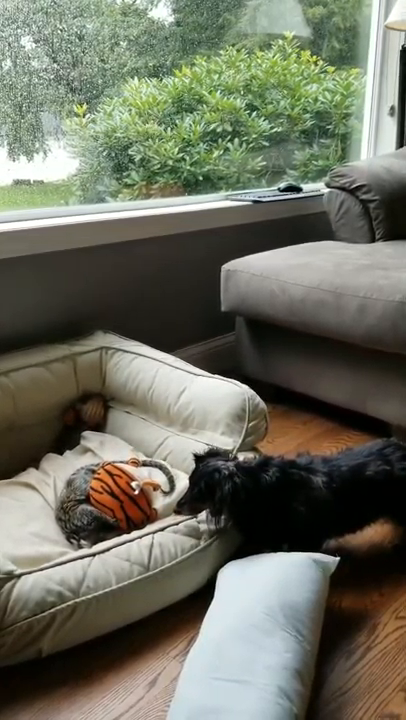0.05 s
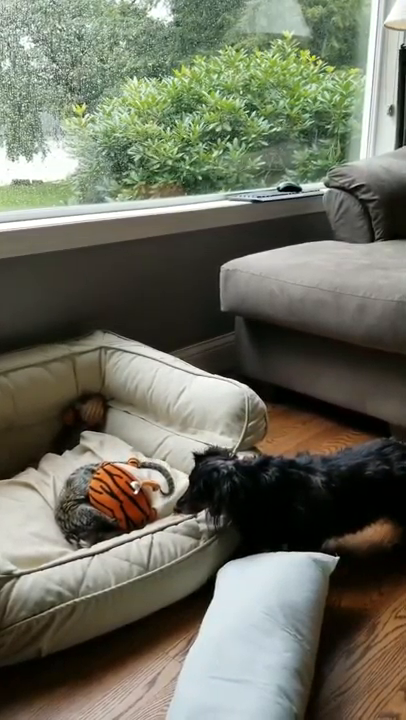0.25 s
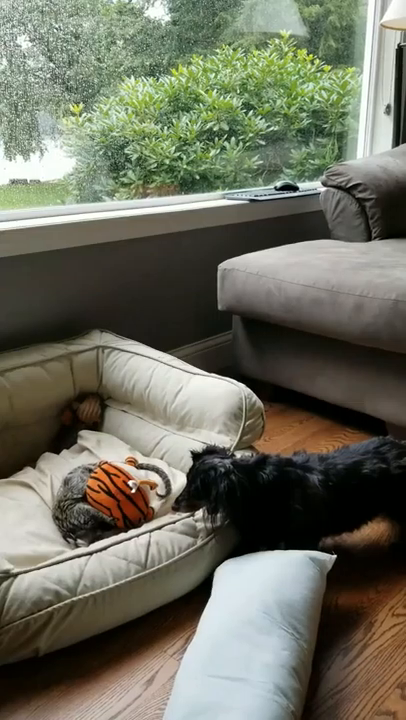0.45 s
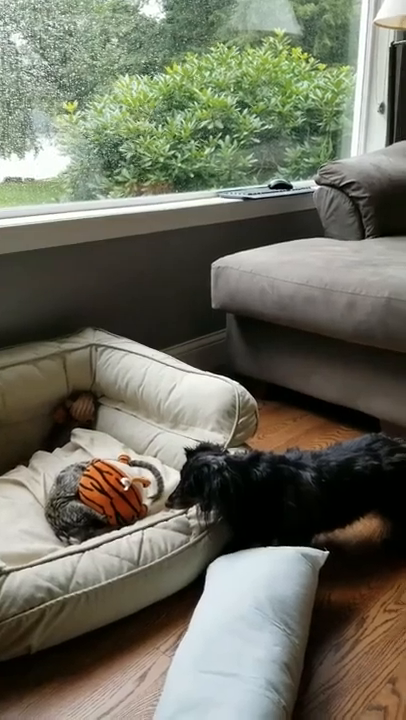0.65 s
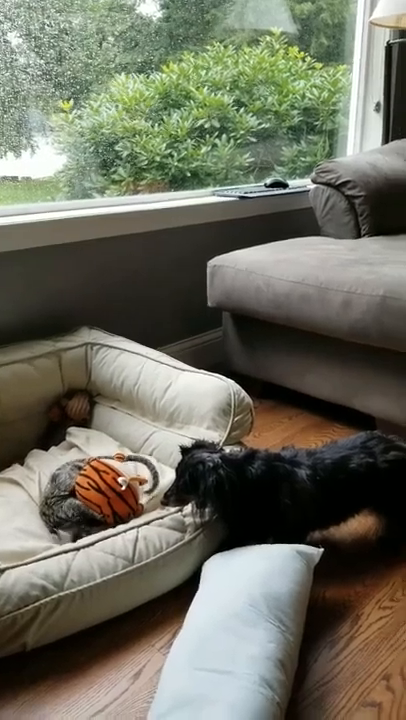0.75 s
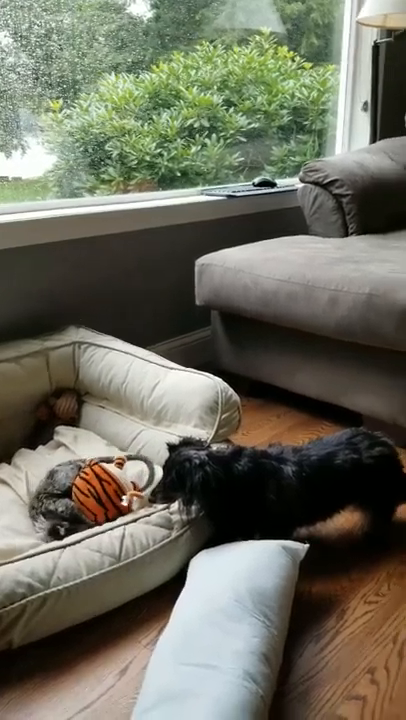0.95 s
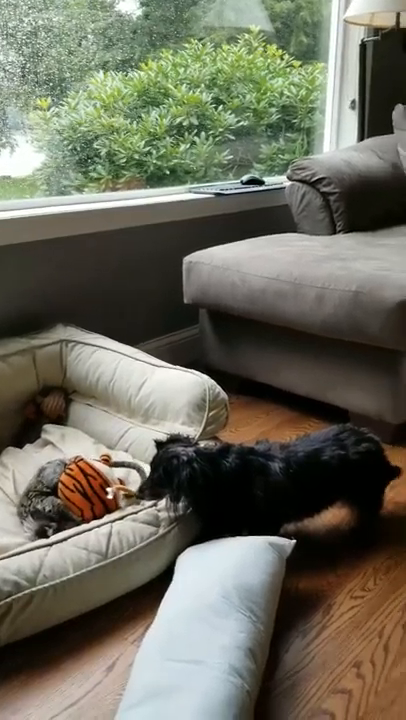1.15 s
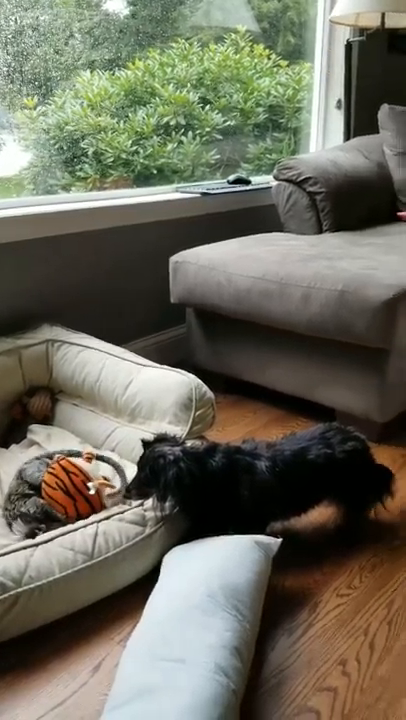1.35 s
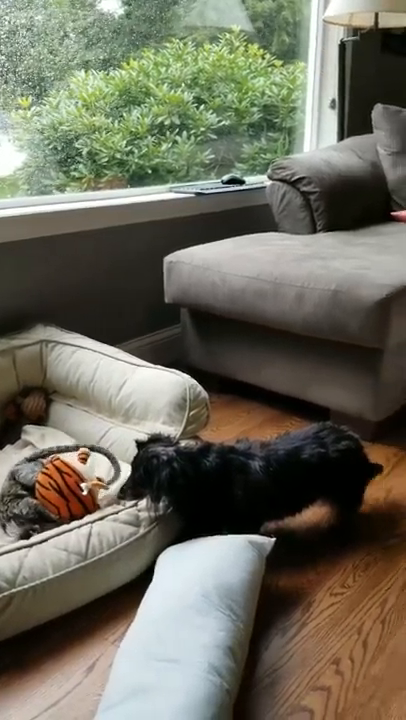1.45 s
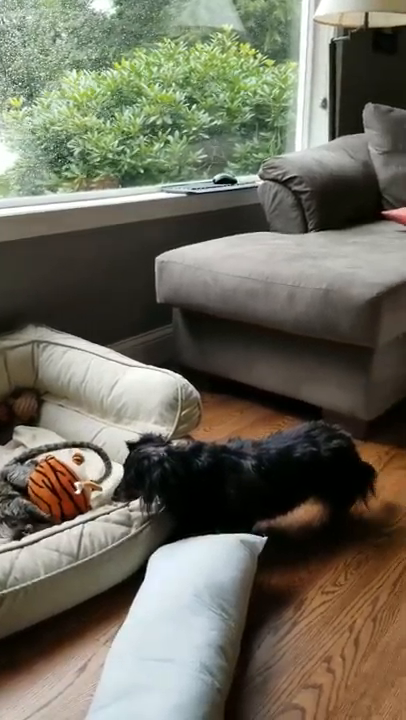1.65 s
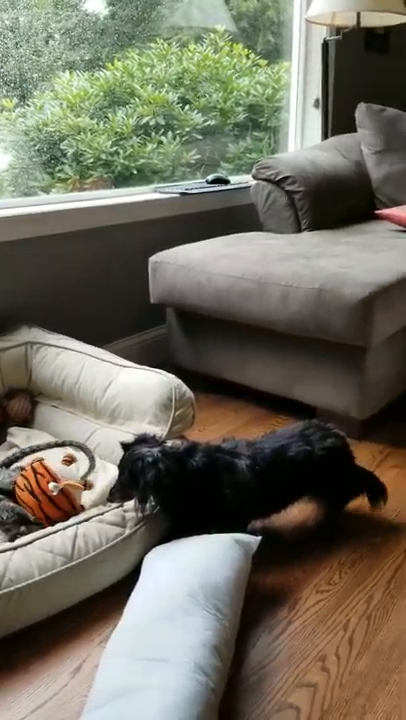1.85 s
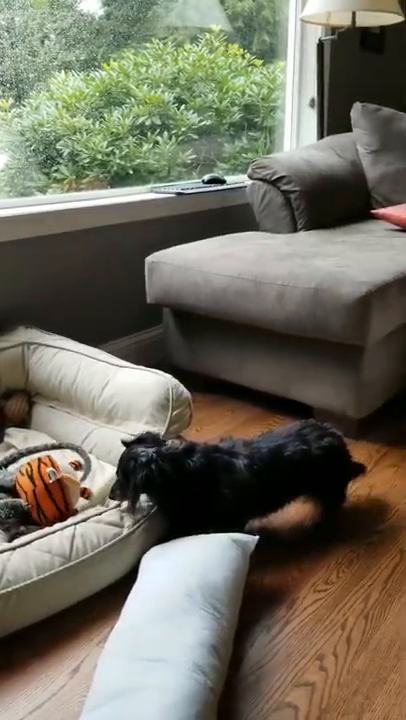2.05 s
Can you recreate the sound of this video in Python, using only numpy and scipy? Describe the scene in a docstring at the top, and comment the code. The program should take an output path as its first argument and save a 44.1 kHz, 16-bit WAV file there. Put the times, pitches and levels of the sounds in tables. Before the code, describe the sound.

A small monkey gives three brief, very high chirps, then a harsh screech and a falling, trilled whistle. The calls echo slightly in a quiet living room, over a few soft bumps and a low rumble.

```python
"""A quiet living room, where a marmoset on a dog's bed gives three high chirps, a harsh screech
and a falling, trilled whistle. Chirps and whistle are gliding tones; the screech is a strained
voice puffing through the resonances of the throat. Hard surfaces throw the calls back, and the
right microphone is shaded from their treble. Underneath sit a few soft low bumps, a tick,
faint scuffs and the rumble and hum of the room."""
import sys
import numpy as np
from scipy import signal
from scipy.fft import rfft, irfft
from scipy.io import wavfile

SR = 44100
rng = np.random.default_rng(int(sys.argv[2]) if len(sys.argv) > 2 else 0)


def store_wav(level_fs):
    """Save 16-bit WAV to argv[1]."""
    pcm = np.round(np.clip(np.atleast_2d(level_fs), -1, 1) * 32767)
    wavfile.write(sys.argv[1], SR, pcm.T.astype(np.int16))


N = 92610
T = np.arange(N) / SR
HZ = np.fft.rfftfreq(N, 1 / SR)

# One contour per chirp. Each row: time in seconds, pitch in Hz, level in dB.
CHIRPS = [
    [(.108, 9440, -76), (.120, 10250, -65), (.127, 10800, -55), (.137, 10370, -60), (.144, 9100, -65.5),
     (.156, 8650, -67), (.166, 8520, -59)],
    [(.266, 7200, -50.5), (.274, 7400, -49), (.280, 8900, -68), (.286, 9900, -44), (.292, 10600, -38.5),
     (.297, 10000, -64), (.305, 8100, -48), (.310, 6860, -37), (.316, 4957, -56), (.322, 3540, -63.5),
     (.329, 2915, -71)],
    [(.523, 8300, -67), (.532, 9400, -52), (.539, 9960, -39), (.549, 9980, -54.5), (.555, 9200, -69),
     (.561, 8140, -47), (.566, 7000, -35.5), (.571, 5890, -49), (.579, 4430, -64.5)],
]
# The chirps' bright edge. Each row: multiple of the pitch, level at full brightness in dB.
CHIRP_OVERTONES = [(2, -1), (3, 14)]
# Hoarseness, most as the middle chirp starts. Each row: time in seconds, jitter as a share of pitch.
CHIRP_JITTER = [(.14, .007), (.27, 0.025), (.29, 0.013), (.54, 0.0053)]

# The screech's faders. Each row: time in seconds, then main band, upper band and low rasp in dB.
SCREECH_FADERS = [(0.7, -74, -82, -87), (0.714, -55.5, -76, -73), (0.748, -46.5, -60.5, -72),
                  (0.794, -52.5, -51.5, -72.5), (0.814, -47, -51, -66), (0.878, -48.5, -45.5, -62),
                  (0.924, -52.5, -51, -66), (0.962, -52, -49, -64.5), (0.988, -55.5, -48.5, -64.5),
                  (1.066, -46.5, -39, -63.5), (1.076, -42.5, -34, -64.5), (1.144, -50.5, -45.5, -64),
                  (1.2, -47, -41, -58.5), (1.226, -50.5, -55, -65), (1.25, -68, -74, -73)]
# The throat's colour at the onset and at full cry. Each row: frequency in Hz, gain in dB.
THROAT_START = [(3000, -49), (4000, -35.5), (4800, -14), (6000, -6.5), (6800, -3), (7600, -6.5),
                (8700, -16.5), (9900, -21), (11000, -17.5), (13000, -22.5), (16000, -11)]
THROAT_FULL = [(3000, -64), (4200, -28), (5500, -17.5), (6500, -8), (7350, 2), (7900, -4), (8900, -20.5),
               (10400, -27.5), (11800, -12.5), (12900, -10), (14300, -11), (15600, 1)]
# The sweep of the throat's upper resonance. Each row: time in seconds, centre in Hz.
UPPER_SWEEP = [(.78, 12200), (.86, 13000), (.95, 13500), (1.03, 14200), (1.09, 13100), (1.17, 13450),
               (1.23, 14000)]
# The resonances of the low rasp. Each row: centre in Hz, width in Hz, relative gain in dB.
RASP_MODES = [(820, 170, -14), (1154, 140, -16), (1750, 74, 1.5), (1865, 89, 0), (2010, 100, -2),
              (2175, 110, -.5), (2290, 70, -1), (2520, 100, -6)]
# The hoarse squeak that ends the screech. Each row: time in seconds, pitch in Hz, level in dB.
SQUEAK = [(1.214, 6690, -50.5), (1.223, 6405, -42.5), (1.229, 6200, -75), (1.236, 6330, -77)]

# The whistle's fall. Each row: time in seconds, pitch at the foot of the trill in Hz, level in dB.
WHISTLE = [(1.422, 9350, -75), (1.450, 9640, -61), (1.463, 8840, -60), (1.478, 8740, -62.5),
           (1.497, 8230, -56), (1.585, 7920, -56.5), (1.660, 7500, -52.5), (1.700, 7275, -53),
           (1.740, 6980, -52), (1.778, 6680, -47.5), (1.815, 6350, -51.5), (1.828, 6280, -56.5),
           (1.846, 6820, -72)]
# The depth of the trill. Each row: time in seconds, upward swing in Hz.
TRILL_DEPTH = [(1.47, 550), (1.52, 400), (1.60, 600), (1.675, 1150), (1.712, 1900), (1.798, 2500),
               (1.825, 100)]

# Slaps off hard surfaces. Each row: delay in seconds, left and right gain in dB re the left direct sound.
REFLECTIONS = [(.0045, -4, -5.5), (.0080, 6.5, -6), (0.0169, -4.5, -3.5)]
# The reverb tail. Each row: frequency in Hz, seconds to fall by 60 dB.
ROOM_T60 = [(1500, 0.23), (4000, 0.4), (7000, 0.32), (10000, 0.27), (15000, 0.17)]
# The shading of the right microphone. Each row: frequency in Hz, gain in dB.
RIGHT_SHADE = [(2400, 1.5), (4500, -1.5), (6000, -12), (7200, -21.5), (8300, -23.5), (9800, -10.5),
               (10800, -1.5), (12500, -1.5), (15500, -36)]

# Soft thuds. Each row: start in seconds, level before panning in dB, pitch in Hz, decay in seconds.
BUMPS = [(.111, -49.5, 151, 0.0041), (.218, -37, 144, 0.0021), (.247, -41.5, 72, 0.0047),
         (0.324, -42.5, 98.4, 0.0046), (.408, -42.5, 100, 0.0037), (0.452, -44, 124, 0.0045),
         (0.482, -56, 89, 0.0027), (0.54, -52.5, 125, 0.0086), (.718, -53, 80, .012)]
# The rustle around the bumps. Each row: time in seconds, level before panning in dB.
RUSTLE_FADER = [(.05, -89), (.13, -63.5), (.29, -54.5), (.335, -51), (.38, -59), (.475, -51.5), (.56, -58),
                (.68, -86)]
# Its dull colour. Each row: frequency in Hz, relative gain in dB.
RUSTLE_COLOUR = [(25, -1), (120, 2.5), (300, -8.5), (600, -19), (1000, -37), (3000, -49)]
# Soft scuffs. Each row: peak time in seconds, level in dB, centre in Hz, half length in seconds.
SCUFFS = [(0.223, -81, 2930, 0.0055), (0.602, -79, 2070, 0.043), (1.013, -61, 9100, 0.048),
          (1.492, -81, 2400, 0.041)]
# The colour of the room tone. Each row: frequency in Hz, relative gain in dB.
RUMBLE_COLOUR = [(20, -7.5), (50, 1.5), (90, -1.5), (130, 2.5), (180, -8.5), (260, -3), (340, -11),
                 (440, -8.5), (600, -19), (850, -23.5), (1100, -28.5), (2000, -31), (4000, -36.5),
                 (9000, -36), (15500, -37)]
# How centred the room tone is. Each row: frequency in Hz, left-right correlation from 0 to 1.
RUMBLE_CORRELATION = [(30, 0.12), (120, 0.67), (300, 0.93), (700, 0.17), (1500, 0.051)]
# The tones of the hum. Each row: pitch in Hz, level in dB.
HUM = [(79, -70.5), (119, -68), (420, -76)]


def chirps():
    """Each chirp arches up as a nearly pure tone, then plunges and turns bright."""
    full_plunge_hz_per_s = 110000
    out = np.zeros(N)
    for contour in CHIRPS:
        fall_hz_per_s = -np.gradient(curve(contour)) * SR
        brightness = np.clip(fall_hz_per_s / full_plunge_hz_per_s, .29, 1)
        out += voice(contour, CHIRP_OVERTONES, curve(CHIRP_JITTER), brightness=brightness)
    return out


def screech():
    """A strained voice rings the throat in two high bands and a low rasp, then breaks into a squeak."""
    puffs = strained_puffs()
    main, upper = throat(puffs)
    cry = (main * amp(4.5 + curve(SCREECH_FADERS))
           + upper * amp(6.5 + curve(SCREECH_FADERS, column=2))
           + rasp(puffs) * amp(2.5 + curve(SCREECH_FADERS, column=3)))
    start_s, end_s, release_db_per_s = SCREECH_FADERS[0][0], SCREECH_FADERS[-1][0], 903
    release = amp(-release_db_per_s * np.maximum(T - end_s, 0))
    squeak = voice(SQUEAK, overtones=[(2, 12)], jitter=.035)
    return cry * release * (T > start_s) + squeak


def strained_puffs(puffs_per_s=430, jitter=.4, spread_db=1.5, duty=.22, steady_share=.09):
    """Rapid puffs of noise, uneven in timing and strength, over a thin steady hiss."""
    cycles = np.cumsum(puffs_per_s * np.exp(jitter * wander(puffs_per_s))) / SR
    strength = amp(spread_db * rng.standard_normal(N))[cycles.astype(int)]
    return rng.standard_normal(N) * (steady_share + strength * np.exp(-(cycles % 1) / duty))


def throat(puffs, open_at_s=.81, opening_s=.1, split_hz=9650, broad_share=.45):
    """The throat opens to full cry; its main resonance shakes while the upper one sweeps."""
    opened = np.clip((T - open_at_s) / opening_s, 0, 1)
    start, full = rfft(colour(puffs, THROAT_START)), rfft(colour(puffs, THROAT_FULL))
    main, upper = [(1 - opened) * unit(irfft(start * band, N)) + opened * unit(irfft(full * band, N))
                   for band in (HZ < split_hz, HZ >= split_hz)]
    shaking_hz = 6980 * (1 + .06 * wander(140))
    main_ring = resonate(main, shaking_hz, width_hz=1300)
    upper_ring = resonate(upper, curve(UPPER_SWEEP), width_hz=2600)
    return unit(broad_share * main + main_ring), unit(broad_share * upper + upper_ring)


def rasp(puffs, swell_db=2.6, drift=.016, waver_hz=22):
    """The grit under the screech: the puffs ring low resonances that waver in level and pitch."""
    out = np.zeros(N)
    for hz, width_hz, db in RASP_MODES:
        gain = amp(db + swell_db * wander(waver_hz))
        out += gain * resonate(puffs, hz * (1 + drift * wander(waver_hz)), width_hz)
    return unit(out)


def whistle(trills_per_s=25.2, crest_s=1.713, dip_db_per_khz=7):
    """A long, wavering fall with a growing trill; the voice thins at each upward flick."""
    flicks = (.5 + .5 * np.cos(2 * np.pi * trills_per_s * (T - crest_s))) ** 2
    swing_hz = curve(TRILL_DEPTH) * flicks
    dip = amp(-dip_db_per_khz * swing_hz / 1000)
    return dip * voice(WHISTLE, overtones=[(2, -15)], jitter=.005, swing_hz=swing_hz, brightness=dip)


def voice(contour, overtones, jitter, swing_hz=0, brightness=1):
    """An unsteady high tone; its overtones, each a multiple and a level in dB, fade out towards 21 kHz."""
    hz = (curve(contour) + swing_hz) * (1 + jitter * wander(615))
    phase = 2 * np.pi * np.cumsum(hz) / SR
    tone = np.sin(phase)
    for multiple, db in overtones:
        audible = np.clip((21000 - multiple * hz) / 4000, 0, 1)
        tone += brightness * audible * amp(db) * np.sin(multiple * phase)
    return np.sqrt(2) * tone * amp(curve(contour, column=2)) * gate(contour)


def room(calls, tail_db=7.5, build_s=.0056):
    """Direct sound, a few hard reflections and a short diffuse tail, shaded on the right."""
    size = SR // 2
    hz, t, noise = signal.stft(rng.standard_normal((2, size)), SR, nperseg=256)
    decay = np.exp(-np.log(1000) * t / read(ROOM_T60, hz)[:, None])
    tail = signal.istft(noise * decay, SR)[1][:, :size]
    tail *= np.clip(T[:size] / build_s - .5, 0, 1)  # a short gap, then the tail fades in
    response = tail / np.linalg.norm(tail[0]) * amp([[tail_db], [tail_db + 1]])
    response[:, 0] += amp([0, 6])  # direct sound, hotter on the right ahead of the shading
    for delay_s, left_db, right_db in REFLECTIONS:
        response[:, round(delay_s * SR)] += amp([left_db, right_db])
    response /= np.linalg.norm(response[0])
    left, right = signal.fftconvolve(calls[None], response, axes=1)[:, :N]
    return np.array([left, colour(right, RIGHT_SHADE)])


def bumps(left_db=-14.5, right_db=4):
    """Low, round thuds with a dull rustle, panned well to the right."""
    rustle = unit(colour(rng.standard_normal(N), RUSTLE_COLOUR))
    out = rustle * amp(curve(RUSTLE_FADER)) * gate(RUSTLE_FADER)
    for start_s, db, hz, decay_s in BUMPS:
        age = np.maximum(T - start_s, 0)
        envelope = (age / decay_s / 2) ** 2 * np.exp(2 - age / decay_s)  # soft attack, peaks at 1
        out += amp(db) * envelope * np.cos(2 * np.pi * hz * age)
    return out * amp([[left_db], [right_db]])


def tick(start_s=.4705, db=-53, decay_s=.0006):
    """One tiny, dry crack of noise in the centre."""
    envelope = (T > start_s) * np.exp(-abs(T - start_s) / decay_s)
    return amp(db) * rng.standard_normal(N) * envelope


def scuffs():
    """Faint, wide hisses that swell and fade, like brushes on fabric."""
    out = np.zeros((2, N))
    for channel in out:
        for peak_s, db, hz, half_s in SCUFFS:
            hiss = unit(resonate(rng.standard_normal(N), hz, width_hz=.38 * hz))
            channel += amp(db) * np.exp(-((T - peak_s) / half_s) ** 2) * hiss
    return out


def room_tone(rumble_db=-59.5, waver_radians=1.46, waver_hz=1.48):
    """A bed of steady rumble with a faint, wavering hum."""
    left, independent = rfft(rng.standard_normal((2, N)))
    correlation = read(RUMBLE_CORRELATION, HZ)
    right = correlation * left + np.sqrt(1 - correlation ** 2) * independent
    rumble = unit(colour(irfft([left, right], N), RUMBLE_COLOUR))
    hum = sum(amp(db) * np.sqrt(2) * np.sin(2 * np.pi * hz * T + waver_radians * wander(waver_hz))
              for hz, db in HUM)
    return amp(rumble_db) * rumble + hum


def resonate(x, hz, width_hz):
    """A resonance of gain 1 that rides a pitch curve, with a double pole for steep sides."""
    carrier = np.exp(2j * np.pi * np.cumsum(hz * np.ones(N)) / SR)
    pole = np.exp(-np.pi * width_hz / SR)
    smoothed = signal.lfilter([(1 - pole) ** 2], [1, -2 * pole, pole * pole], x / carrier)
    return 2 * (carrier * smoothed).real


def wander(rate_hz):
    """Smooth random movement up to about the given rate, rms 1."""
    return unit(irfft(rfft(rng.standard_normal(N)) / (1 + (HZ / rate_hz) ** 4), N))


def colour(x, eq):
    """Applies an EQ curve."""
    return irfft(rfft(x) * amp(read(eq, HZ)), N)


def read(table, hz):
    """Looks up a frequency table on a log axis."""
    frequencies, values = np.transpose(table)
    return np.interp(np.log(hz + 1), np.log(frequencies), values)


def curve(table, column=1):
    """One column of a time table, drawn out to every sample."""
    rows = np.array(table)
    return np.interp(T, rows[:, 0], rows[:, column])


def gate(table, fade_s=.00067):
    """Open between the first and last times of a table."""
    return np.clip(np.minimum(T - table[0][0], table[-1][0] - T) / fade_s, 0, 1)


def amp(db):
    """Decibels to gain."""
    return 10 ** (np.asarray(db) / 20)


def unit(x):
    """Scales to rms 1."""
    return x / np.sqrt(np.mean(x ** 2) + 1e-20)


def scene():
    """The calls ring in the room; the small noises and room tone stay dry beneath them."""
    return room(chirps() + screech() + whistle()) + tick() + bumps() + room_tone() + scuffs()


def record(dry):
    """A steep high cut takes the very top off the mix."""
    cutoff_hz = 15850
    high_cut = signal.firwin(601, cutoff_hz, window=("kaiser", 9), fs=SR)
    return signal.oaconvolve(dry, high_cut[None], "same")


dry = scene()
out = record(dry)
store_wav(out)
```